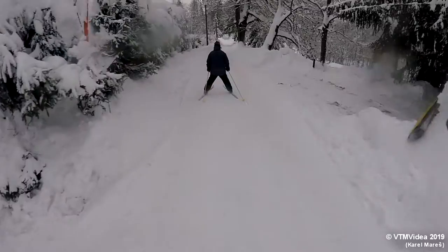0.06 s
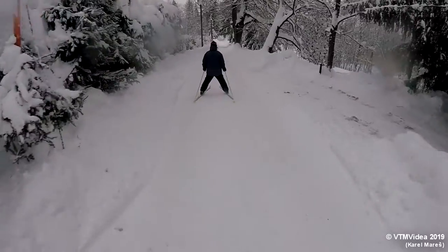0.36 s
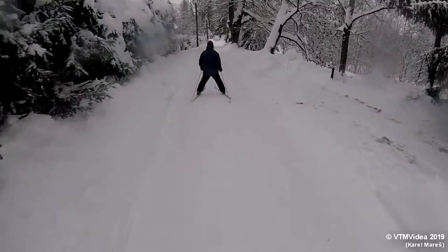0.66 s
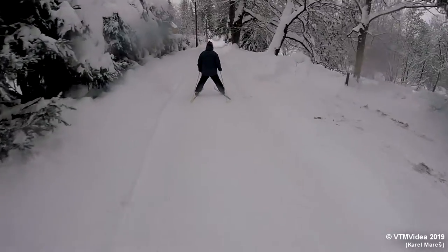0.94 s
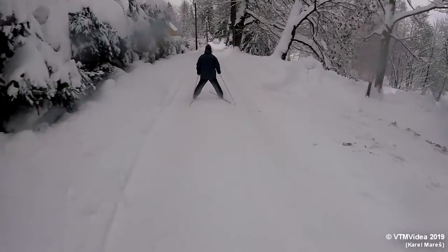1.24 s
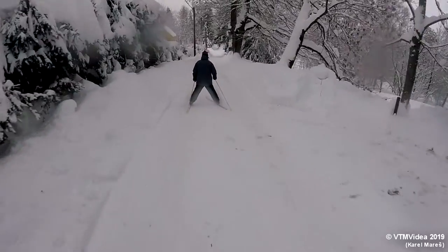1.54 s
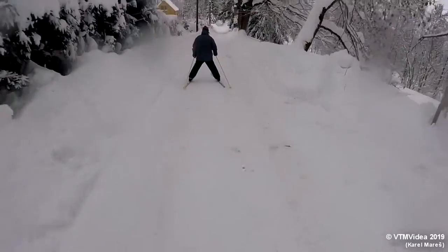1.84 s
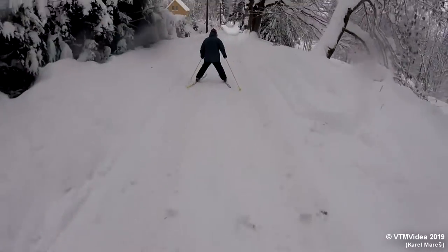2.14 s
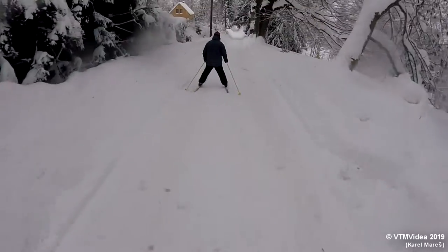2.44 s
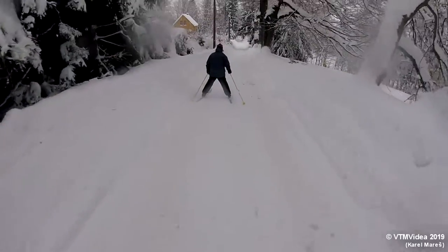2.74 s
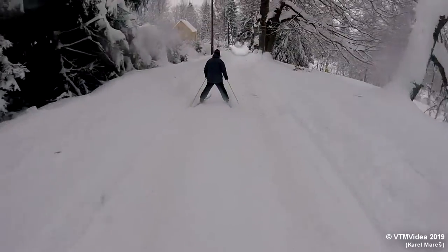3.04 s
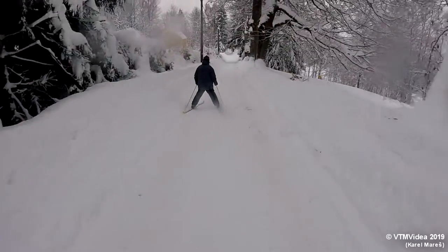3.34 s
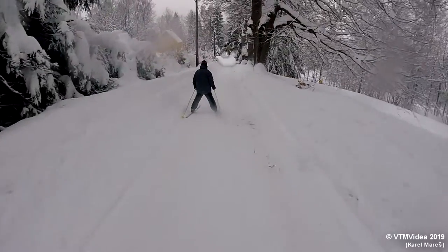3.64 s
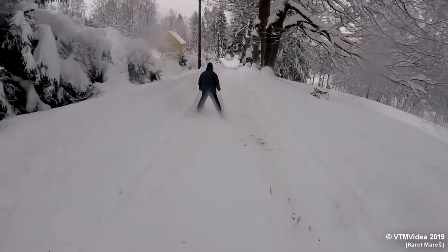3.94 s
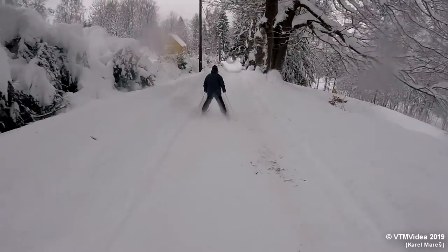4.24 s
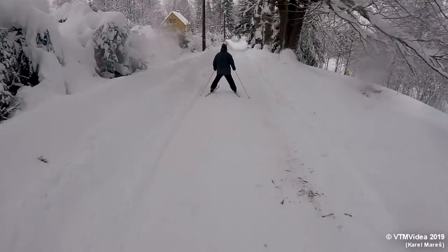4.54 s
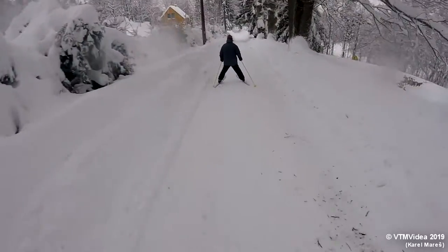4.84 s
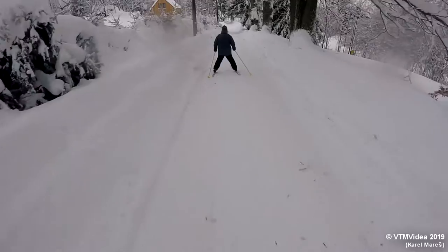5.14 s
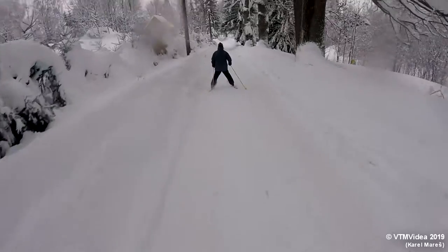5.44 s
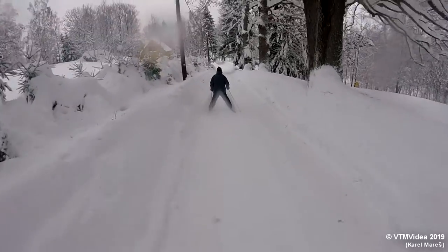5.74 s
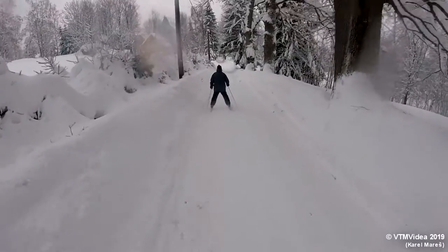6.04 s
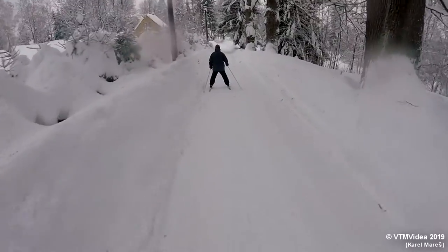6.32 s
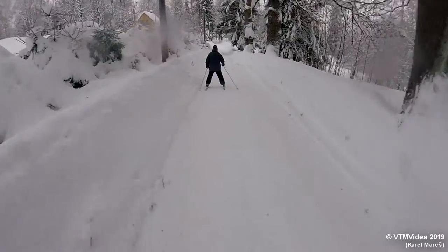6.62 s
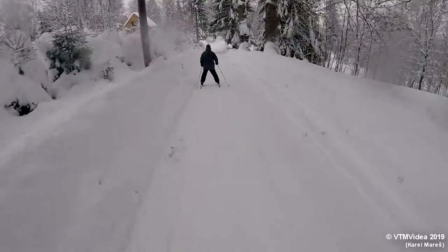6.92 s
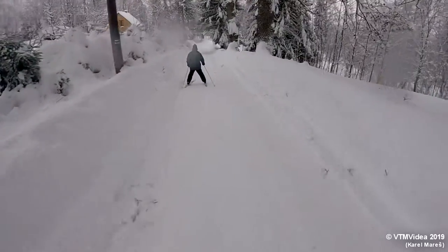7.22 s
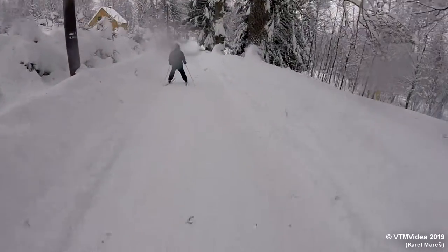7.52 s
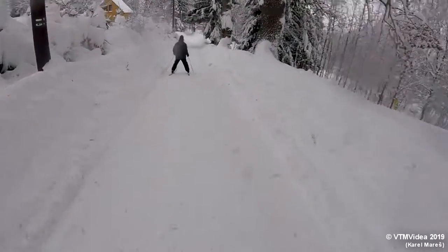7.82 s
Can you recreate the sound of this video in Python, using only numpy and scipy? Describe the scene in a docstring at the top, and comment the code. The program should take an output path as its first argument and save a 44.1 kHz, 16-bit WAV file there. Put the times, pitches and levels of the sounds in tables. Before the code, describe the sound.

Skis hiss and rattle over fresh snow while gusts of wind rumble and buffet the moving microphone.

```python
"""Skis glide down a snowy trail, heard from a microphone that the skier carries.
The bases hiss on fresh snow, and skis and bindings chatter in short rattles over the uneven track.
Now and then a steel edge squeaks on packed snow, or a lump knocks against a ski.
The head wind buffets the microphone in gusts, and a limiter holds the peaks."""
import sys
import numpy as np
from scipy import signal
from scipy.fft import rfft, irfft
from scipy.io import wavfile
from scipy.ndimage import uniform_filter1d, minimum_filter1d

SR = 44100
rng = np.random.default_rng(int(sys.argv[2]) if len(sys.argv) > 2 else 0)


def output_pcm(signal):
    """Save a mono or channel-first signal as 16-bit PCM at the path in sys.argv[1].

    Samples are clipped to [-1, 1] before scaling.
    """
    pcm = np.clip(np.atleast_2d(signal).T, -1, 1) * 32767
    wavfile.write(sys.argv[1], SR, np.round(pcm).astype(np.int16))


N = 351477
TIME = np.arange(N) / SR


def from_db(db):
    """Turn decibels into a factor to multiply a sound by."""
    return 10 ** (np.asarray(db) / 20)


def unit_power(sound):
    """Scale a sound so that its average power is 1."""
    return sound / np.sqrt(np.mean(sound ** 2) + 1e-20)


def curves(rows):
    """Join a table's rows with straight lines over time: one curve for each column after the first."""
    times, *columns = np.transpose(rows)
    return [np.interp(TIME, times, column) for column in columns]


def add(out, start_s, sound):
    """Mix a short sound in at the given time."""
    start = int(np.clip(start_s * SR, 0, N - 1))
    out[start:start + len(sound)] += sound[:N - start]


def drift(rate):
    """A smooth random wobble of size about 1; rate is roughly its changes per second."""
    step, warm_up = 20, 4000
    pole = np.exp(-2 * np.pi * step * rate / SR)
    noise = rng.standard_normal(N // step + warm_up + 2)
    slow = signal.lfilter([1], [1, -2 * pole, pole * pole], noise)[warm_up:]
    return np.interp(np.arange(N) / step, np.arange(len(slow)), unit_power(slow))


def grains(spread_db, rate):
    """Countless tiny impacts merge into a noise whose strength comes in clumps."""
    noise = rng.standard_normal(N)
    clumps = from_db(spread_db * np.clip(drift(rate), -2, 2))
    return unit_power(noise * clumps)


# Pitches at which ski and binding ring, or are hollow (negative lift).
# Each row: pitch in Hz, width in Hz, lift in dB at full resonance.
SKI_RESONANCES = [(1398, 110, 4.5), (1680, 120, 3), (2050, 120, 3.5), (2456, 130, 4.5), (2640, 140, -3),
                  (2704, 120, 6.5), (2930, 55, 6), (3353, 65, 9), (3510, 150, -4), (3855, 140, 4),
                  (3900, 220, -4), (4970, 380, 7.5), (5520, 470, 8), (6190, 330, -2)]

def response(spectrum, resonance=0, uneven_db=0, size=8192):
    """The sound of one tap: a broad tone colour plus a chosen share of the ski's resonances."""
    hz = np.maximum(np.fft.rfftfreq(size, 1 / SR), 1)
    point_hz, point_db = np.transpose(spectrum)
    db = np.interp(np.log(hz), np.log(point_hz), point_db)
    db -= 40 * np.log10(np.maximum(hz / point_hz[-1], 1))   # fade above the last point
    for centre, width, lift in SKI_RESONANCES:
        height = resonance * lift + uneven_db * rng.standard_normal()   # each spot rings differently
        db += height / (1 + (2 * (hz - centre) / width) ** 2)
    # Fold to "minimum phase", so that the body rings only after it is struck.
    cepstrum = irfft(np.log(from_db(db)))
    cepstrum[1:size // 2] *= 2
    cepstrum[size // 2 + 1:] = 0
    tap = irfft(np.exp(rfft(cepstrum)))
    return tap / np.linalg.norm(tap)


def through(force, tap):
    """The sound of a force in a body: every sample sets off the sound of one tap."""
    return signal.fftconvolve(force, tap)[:N]


def turbulence(spectrum, span_s):
    """Random air pressure whose power is steady over span_s and lumpy within it."""
    air = through(rng.standard_normal(N), response(spectrum))
    window = int(span_s * SR)
    power = uniform_filter1d(uniform_filter1d(air ** 2, window), window)
    return air / np.sqrt(np.abs(power) + 1e-9)


# Gusts of head wind. Each row: start in seconds, length in seconds, buffeting in dB, flutter in dB.
HEAD_WIND_GUSTS = [(0.0, 0.26, -14.5, -36), (0.124, 0.05, -12.5, -19.5), (0.34, 0.21, -18.5, -29.5),
                   (0.594, 0.096, -14.5, -24), (0.79, 0.63, -15.5, -27), (1.365, 0.04, -10.5, -19.5),
                   (1.57, 0.67, -19.5, -34.5), (1.824, 0.14, -17.5, -25.5), (2.583, 0.2, -13.5, -26),
                   (2.883, 0.039, -9.5, -21), (3.12, 0.096, -32, -33), (3.625, 0.37, -23.5, -42),
                   (4.104, 0.094, -15.5, -31), (4.362, 0.14, -11.5, -24.5), (4.58, 0.021, -12, -19),
                   (4.692, 0.22, -16, -30.5), (4.956, 0.074, -13.5, -29.5), (6.512, 0.06, -15, -30),
                   (6.729, 0.46, -23, -34.5), (6.948, 0.054, -14.5, -32), (7.091, 0.032, -16, -26.5)]

def gusts(attack_s=0.025, release_s=0.02):
    """Strength of buffeting and of flutter: each gust swells, holds and dies away."""
    buffet, flutter = from_db(-37), from_db(-40.5)   # the lull between gusts
    for start, length, buffet_db, flutter_db in HEAD_WIND_GUSTS:
        early = np.maximum(start - TIME, 0)
        late = np.maximum(TIME - start - length, 0)
        swell = np.exp(-np.minimum(early / attack_s + late / release_s, 20))
        buffet = np.maximum(buffet, from_db(buffet_db) * swell)
        flutter = np.maximum(flutter, from_db(flutter_db) * swell)
    return buffet, flutter


# Tone colours of the wind, deepest first. Each row: frequency in Hz, relative level in dB.
RUMBLE_TONE = [(5, -39.5), (14, -5), (29, 5.5), (50, -2), (70, -10), (110, -20.5), (250, -50), (600, -58)]
BUFFET_TONE = [(30, -22.5), (65, 4), (105, 1), (160, -7.5), (210, -26), (280, -36.5), (500, -52.5)]
FLUTTER_TONE = [(90, -19), (185, 0.5), (240, -8.5), (300, -13.5), (400, -23.5), (600, -38), (2000, -53)]
# The slow rumble of the air stream. Each row: time in seconds, level in dB.
RUMBLE_LEVELS = [(0.0, -15), (2.2, -15.5), (2.35, -22.5), (2.65, -13.5), (3.15, -19), (3.48, -28),
                 (3.78, -13.5), (4.03, -16), (5.05, -15), (5.17, -20.5), (5.55, -24), (5.85, -16),
                 (6.13, -20.5), (6.52, -14), (6.65, -16), (7.12, -15.5), (7.3, -24), (7.97, -27)]
# Sharp swirls of air pop on the microphone. Each row: time in seconds, peak in dB, half width in seconds.
AIR_POPS = [(0.152, -8.5, 0.00072), (0.248, -20, 0.00067), (0.654, -11, 0.0018), (1.413, -14, 0.0017),
            (2.913, -11, 0.0017), (4.43, -2, 0.0025), (6.468, -16, 0.0016)]

def wind():
    """Big swirls of air rumble all the time; in gusts, smaller ones tear off the microphone's housing."""
    rumble_db, = curves(RUMBLE_LEVELS)
    buffet_gain, flutter_gain = gusts()
    bunches = drift(rate=25.7)   # swirls leave the housing in bunches
    rumble = from_db(rumble_db + 2.62 * drift(rate=7.6)) * turbulence(RUMBLE_TONE, span_s=0.07)
    buffet = buffet_gain * turbulence(BUFFET_TONE, span_s=0.043) * unit_power(from_db(4.03 * bunches))
    flutter = flutter_gain * turbulence(FLUTTER_TONE, span_s=0.035) * unit_power(from_db(4.4 * bunches))
    air = rumble + buffet + flutter
    for centre, db, width in AIR_POPS:
        offset = (TIME[:SR // 50] - 0.01) / width
        pop = (1 - 2 * offset ** 2) * np.exp(-offset ** 2)   # a spike with a dip on each side
        add(air, centre - 0.01, from_db(db) * pop)
    return air


# Dull knocks of a ski on a lump. Each row: start in seconds, level in dB.
LUMP_KNOCKS = [(5.874, -34), (6.743, -27), (7.59, -19.5), (7.864, -26.5)]
# Their tone colour. Each row: frequency in Hz, relative level in dB.
KNOCK_TONE = [(150, -19), (450, 5), (820, 13), (1200, 11), (1800, -6), (2600, -19), (5000, -42)]

def knocks(decay_s=0.0046):
    """A lump strikes the base of a ski: one push and a short crumbling."""
    force = np.zeros(N)
    age = TIME[:SR // 20]
    for start, db in LUMP_KNOCKS:
        blow = 0.27 * rng.standard_normal(len(age)) * np.exp(-age / decay_s)
        blow[0] = 1   # the push
        add(force, start, from_db(db) * blow)
    body = response(KNOCK_TONE, resonance=0.5)
    return through(force, body / np.abs(body).max())


# Squeaks on packed snow. Each row: start in seconds, length in seconds, pitch in Hz, level in dB.
EDGE_SQUEAKS = [(0.075, 0.026, 5500, -29), (0.147, 0.029, 5530, -30), (0.152, 0.025, 2280, -30.5),
                (0.412, 0.013, 2420, -30), (0.496, 0.09, 1760, -32.5), (0.656, 0.014, 1760, -27),
                (1.565, 0.011, 2320, -30), (1.823, 0.012, 2850, -25), (3.563, 0.013, 2650, -22.5),
                (5.409, 0.028, 2330, -31), (5.48, 0.029, 1420, -26.5), (5.86, 0.026, 1700, -29),
                (6.912, 0.13, 1640, -33.5), (7.064, 0.1, 1770, -35.5), (7.442, 0.16, 980, -38.5),
                (7.587, 0.011, 1650, -22.5)]

def squeaks(width_hz=650):
    """A steel edge sticks and slips at a loose rate, which gives a short, rasping chirp."""
    out = np.zeros(N)
    for start, length, hz, db in EDGE_SQUEAKS:
        count = int(length * SR)
        slips = rng.standard_normal(SR // 4)[:count] * signal.windows.tukey(count, 0.5)
        squeak = np.pad(slips, (0, SR // 50))   # room to ring out
        band = signal.iirpeak(hz, hz / width_hz, fs=SR)
        for _ in range(2):
            squeak = signal.lfilter(*band, squeak)
        add(out, start, from_db(db) * squeak * np.sqrt(count / np.sum(squeak ** 2)))
    return out


# A ski flaps evenly over rough stretches.
# Each row: first and last slap in seconds, number of slaps, clack in dB, bright ring in dB.
FLAPPING = [(0.073, 0.541, 7, -36, -37), (0.94, 1.174, 4, -33, -42.5), (1.566, 1.898, 5, -27, -30),
            (1.979, 2.222, 4, -31.5, -32), (2.284, 2.566, 5, -29, -35), (2.666, 2.928, 4, -27, -33.5),
            (3.157, 3.456, 5, -27.5, -28), (3.563, 3.932, 5, -27.5, -29), (4.032, 4.189, 3, -30, -31.5),
            (4.42, 4.757, 5, -28.5, -34), (5.0, 5.204, 3, -41, -38), (5.396, 5.689, 4, -36.5, -35),
            (6.269, 6.501, 3, -34, -30)]
# Single hard clacks. Each row: start in seconds, length in seconds, clack in dB, bright ring in dB.
HARD_CLACKS = [(0.081, 0.0037, -31, -24), (0.461, 0.016, -30, -37), (0.661, 0.0065, -37, -36),
               (0.741, 0.04, -34, -40), (1.215, 0.013, -28, -31), (1.242, 0.011, -27, -36),
               (1.386, 0.016, -25.5, -40), (1.53, 0.0088, -26, -42), (1.774, 0.015, -22, -31),
               (1.933, 0.012, -32, -34), (1.978, 0.007, -27, -38), (2.35, 0.0061, -24, -36),
               (2.425, 0.0093, -29, -42), (2.496, 0.0058, -31, -37), (2.669, 0.007, -33, -36),
               (2.734, 0.009, -27, -33), (2.805, 0.0075, -23, -38), (2.854, 0.016, -32, -29),
               (2.923, 0.0074, -22, -30), (2.951, 0.032, -26.5, -34), (3.018, 0.012, -25, -33),
               (3.062, 0.014, -29, -24), (3.079, 0.0087, -19.5, -26), (3.13, 0.0055, -28, -33),
               (3.172, 0.017, -23, -38), (3.381, 0.014, -32, -33), (3.549, 0.0044, -30, -26),
               (3.618, 0.0057, -26, -29), (3.654, 0.0062, -22, -27), (3.932, 0.014, -36, -33),
               (4.115, 0.014, -31, -43), (4.265, 0.022, -34, -43), (4.193, 0.0065, -38, -49),
               (4.32, 0.019, -29, -24.5), (4.522, 0.0062, -28, -25.5), (4.67, 0.0055, -45, -33),
               (4.864, 0.021, -34, -29.5), (5.0, 0.004, -22, -46), (5.012, 0.014, -24.5, -31),
               (5.106, 0.0055, -40, -36), (5.21, 0.007, -20, -22.5), (5.223, 0.0085, -24, -51),
               (5.48, 0.0082, -28, -40), (5.516, 0.009, -32, -28), (5.813, 0.051, -28, -36),
               (5.872, 0.004, -35, -43), (6.016, 0.007, -28.5, -31), (6.062, 0.034, -29, -38),
               (6.402, 0.0049, -45, -50), (6.57, 0.047, -32.5, -48), (6.928, 0.028, -30, -49),
               (7.156, 0.011, -30, -42), (7.225, 0.032, -41, -36), (7.404, 0.041, -34, -35),
               (7.585, 0.021, -26, -31.5), (7.604, 0.0056, -20.5, -33)]

def contacts(rebound_s=0.021, rebound_loss_db=3, bumps_per_s=9, contact_s=0.011, spread_db=0.9):
    """List every touch of ski and binding: hard clacks, slaps, rebounds and small bumps."""
    touches = []
    for first, last, slaps, clack_db, ring_db in FLAPPING:
        for start in np.linspace(first, last, round(slaps)):
            rebound = start + rebound_s * rng.uniform(0.92, 1.08)   # the binding answers each slap
            touches.append((start, clack_db, ring_db))
            touches.append((rebound, clack_db - rebound_loss_db, ring_db - rebound_loss_db))
    # Small bumps rattle the other ski at random, harder where the bases rub harder.
    rub_db = curves(GLIDE_LEVELS)[-1]
    for i in np.flatnonzero(rng.random(N) < bumps_per_s / SR):
        touches.append((TIME[i], rub_db[i] + 1, rub_db[i] - 6))
    rows = list(HARD_CLACKS)
    for start, clack_db, ring_db in touches:
        length = contact_s * np.exp(0.44 * rng.standard_normal())
        harder_db = spread_db * rng.standard_normal()
        rows.append((start, length, clack_db + harder_db, ring_db + harder_db))
    return rows


# Tone colours of a clack and its bright ring. Each row: frequency in Hz, relative level in dB.
CLACK_TONE = [(200, -4.5), (500, -9), (850, -2), (1250, 3.5), (1800, 4), (2900, -1.5), (3600, -6.5),
              (4500, -8), (7000, -30), (12000, -52)]
RING_TONE = [(2500, -9), (4000, -1), (4600, 2), (5200, 9), (6000, 1.5), (7100, 3), (8000, -26),
             (10200, -7.5), (11500, -29), (15000, -45)]

def chatter(strike=0.1, strike_s=0.00033, release_s=0.002):
    """Each rattle is a first strike and a short run of ticks that make ski and binding ring."""
    out = np.zeros(N)
    ticks, fine_ticks = grains(3.3, rate=540), grains(1.5, rate=500)
    for start, length, clack_db, ring_db in contacts():
        first = int(start * SR)
        age = TIME[:min(int(length * SR) + SR // 50, N - first)]
        span = slice(first, first + len(age))
        fade = np.exp(-np.maximum(age - 0.79 * length, 0) / release_s)
        force = (1 + strike * np.exp(-age / strike_s)) * fade
        clack_tap = response(CLACK_TONE, resonance=1.0, uneven_db=3.5, size=2048)
        ring_tap = response(RING_TONE, resonance=0.99, uneven_db=7.0, size=2048)
        clack = from_db(clack_db) * through(force * ticks[span], clack_tap)
        ring = from_db(ring_db) * through(force * fine_ticks[span], ring_tap)
        add(out, start, clack + ring)
    return out


def weight_on_skis(flap_db=1.5, lag_s=0.019):
    """The weight, in dB, follows the uneven track; a flapping ski presses down just after each slap."""
    weight_db = 2.34 * np.clip(drift(rate=20.7), -2, 2) + 0.68 * drift(rate=11.7)
    for first, last, slaps, _, _ in FLAPPING:
        cycles = (TIME - first - lag_s) / (last - first) * (slaps - 1)
        inside = (cycles > -1 / 4) & (cycles < slaps - 1 / 4)
        weight_db[inside] += flap_db * np.cos(2 * np.pi * cycles[inside])
    return weight_db


# The bases on the snow, before boosts and weight are added.
# Each row: time in seconds, powder spray in dB, ploughing in dB, rubbing in dB.
GLIDE_LEVELS = [(0.0, -43.5, -40.5, -33.5), (0.42, -42.5, -40, -36), (0.6, -40, -34.5, -31),
                (0.93, -46.5, -44, -36.5), (1.2, -43.5, -40.5, -32.5), (1.53, -43.5, -38.5, -33),
                (1.78, -38.5, -37.5, -31), (1.95, -41, -43, -32.5), (2.11, -46, -44.5, -35),
                (2.46, -41, -40.5, -33.5), (2.62, -46.5, -38, -36), (2.68, -40.5, -37, -34.5),
                (2.97, -45, -45.5, -35), (3.24, -43, -40.5, -31), (4.08, -47, -43, -38),
                (4.44, -42.5, -37.5, -33.5), (4.75, -43.5, -43.5, -37.5), (4.84, -51, -44, -43),
                (4.86, -48, -42.5, -39.5), (5.35, -42.5, -40, -32.5), (5.99, -47.5, -43, -39.5),
                (6.3, -40, -42, -33), (6.41, -46.5, -42.5, -36), (6.59, -41, -34.5, -33.5),
                (6.73, -48.5, -43.5, -37), (6.95, -42.5, -36, -34.5), (7.13, -43.5, -38, -36),
                (7.37, -37.5, -35, -32), (7.86, -47, -42, -38.5), (7.97, -43, -40.5, -39)]
# Tone colours of these three sounds. Each row: frequency in Hz, relative level in dB.
SPRAY_TONE = [(2000, -1), (4200, -3), (5200, 2.5), (6500, 5.5), (8000, 3), (9200, 1), (10300, 0.5),
              (11000, -11), (11600, -16.5), (12700, -20.5), (13800, -13.5), (15000, -46)]
PLOUGH_TONE = [(100, -23.5), (250, -3.5), (400, 0.5), (600, -0.5), (950, -2), (1350, -8.5), (3000, -26)]
RUB_TONE = [(500, -34), (1000, -2.5), (1700, 3), (2800, 0), (3700, -5), (4300, -7), (5200, -0.5),
            (6200, -6.5), (7500, -22), (11000, -58)]

def glide(plough_boost_db=1, spray_boost_db=4):
    """Snow is pushed aside, rubs along the bases and flies off as fine powder."""
    spray_db, plough_db, rub_db = curves(GLIDE_LEVELS)
    weight_db = weight_on_skis()
    push = from_db(plough_boost_db + plough_db + 1.12 * weight_db) * grains(3.6, rate=250)
    plough = through(push, response(PLOUGH_TONE))
    rub = 0
    for _ in range(2):   # each ski crunches over its own snow
        crunch = from_db(rub_db + 0.61 * weight_db) * grains(2.8, rate=140) / np.sqrt(2)
        rub += through(crunch, response(RUB_TONE, resonance=0.4))
    powder = from_db(spray_boost_db + spray_db + 0.71 * weight_db) * grains(1.4, rate=250)
    spray = through(powder, response(SPRAY_TONE, resonance=0.34))
    return plough + rub + spray


def scene():
    """Wind on the microphone over the skis below it, in one channel."""
    return (wind() + glide() + chatter() + squeaks() + knocks())[None]


def record(dry, ceiling_db=-3.5, hold_s=0.0041, cutoff_hz=15100):
    """A fast limiter turns the strongest peaks down, then a filter cuts the highest treble."""
    window = int(hold_s * SR)
    allowed = np.minimum(1, from_db(ceiling_db) / (np.abs(dry) + 1e-9))
    gain = uniform_filter1d(minimum_filter1d(allowed, window), window)
    treble_cut = signal.ellip(10, 0.1, 80, cutoff_hz, fs=SR, output="sos")
    return signal.sosfilt(treble_cut, dry * gain)


dry = scene()
out = record(dry)
output_pcm(out)
```